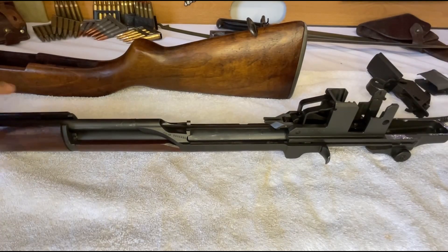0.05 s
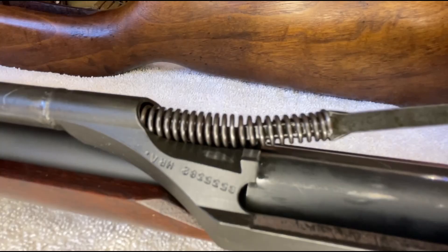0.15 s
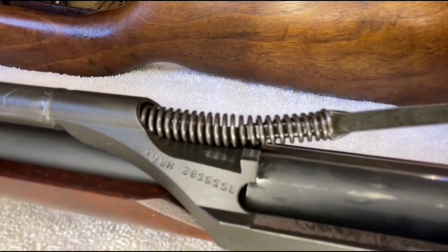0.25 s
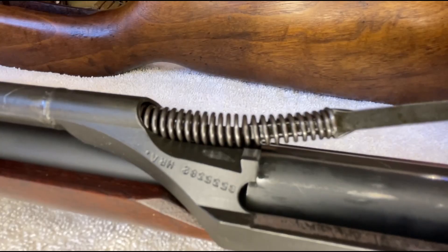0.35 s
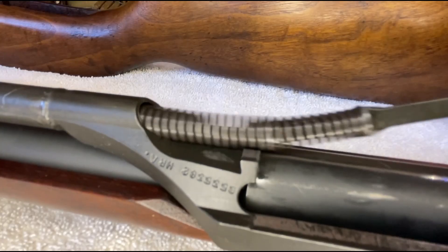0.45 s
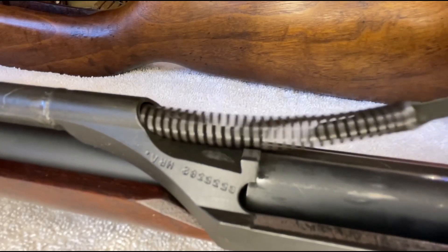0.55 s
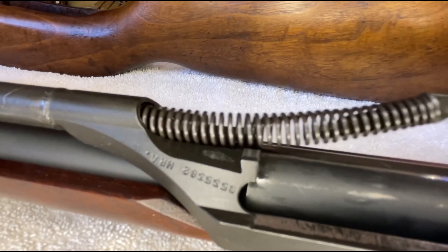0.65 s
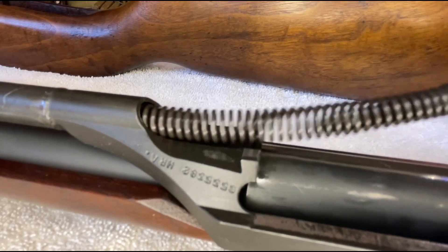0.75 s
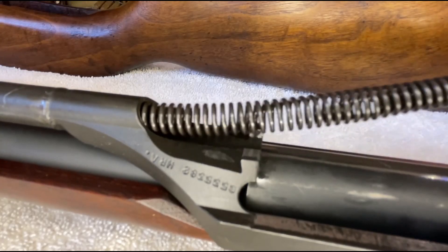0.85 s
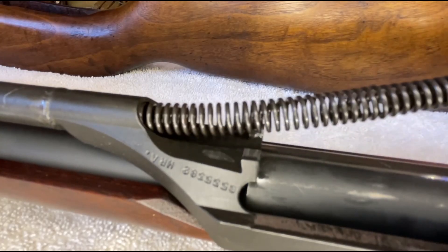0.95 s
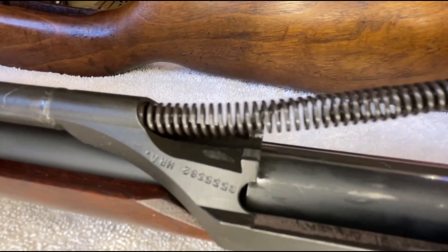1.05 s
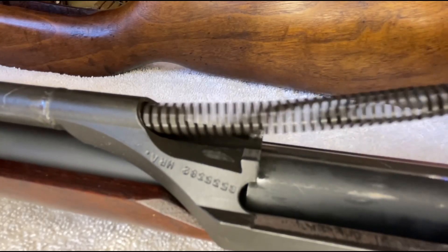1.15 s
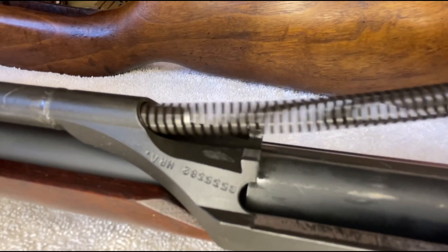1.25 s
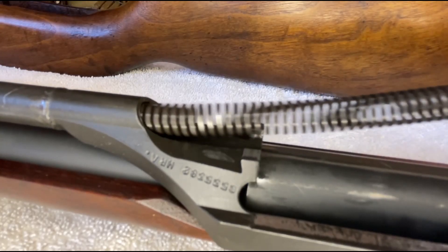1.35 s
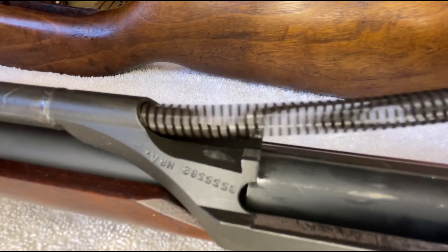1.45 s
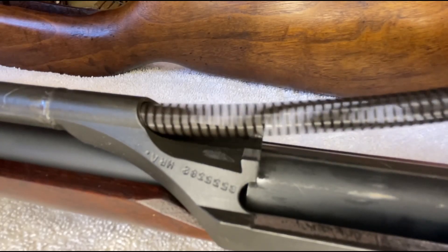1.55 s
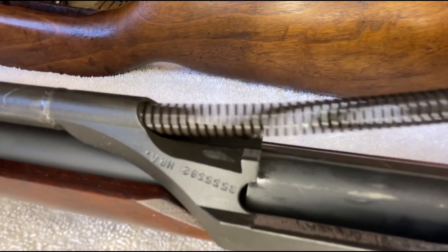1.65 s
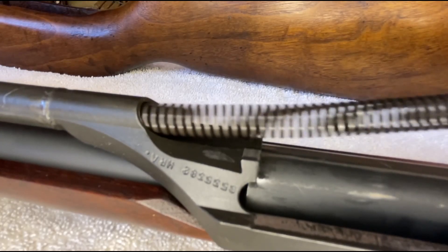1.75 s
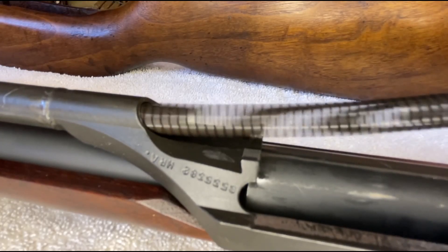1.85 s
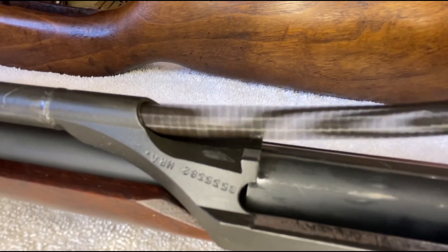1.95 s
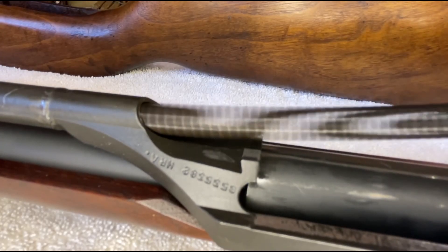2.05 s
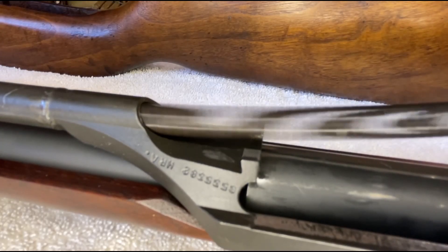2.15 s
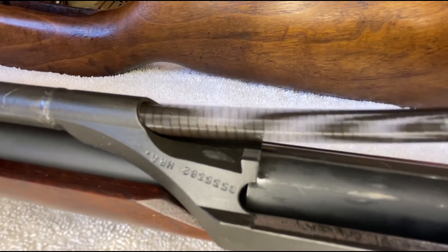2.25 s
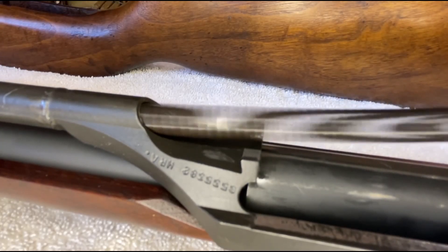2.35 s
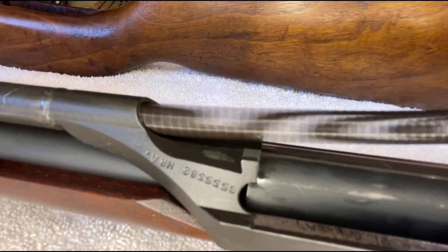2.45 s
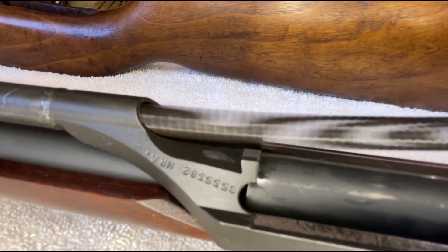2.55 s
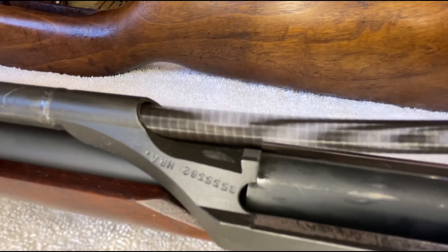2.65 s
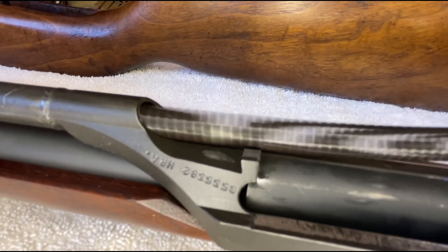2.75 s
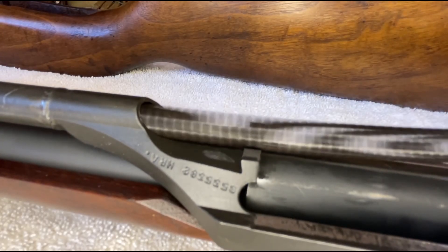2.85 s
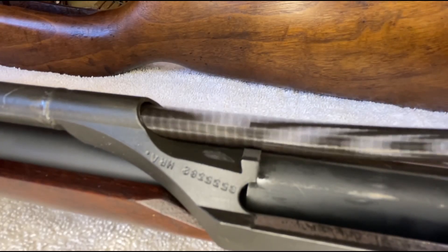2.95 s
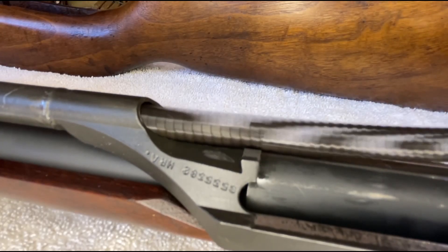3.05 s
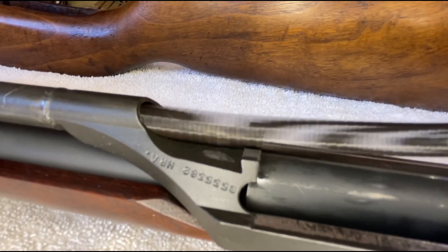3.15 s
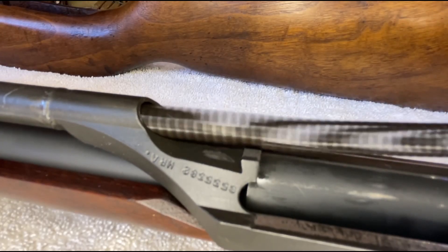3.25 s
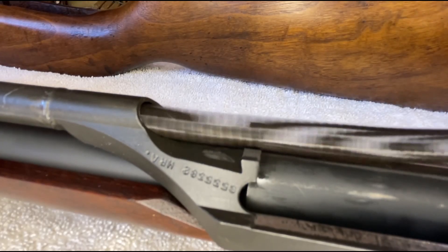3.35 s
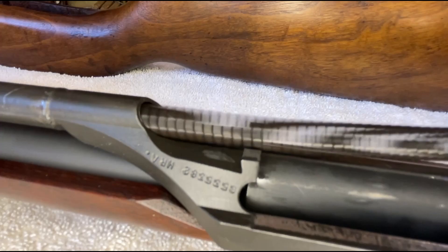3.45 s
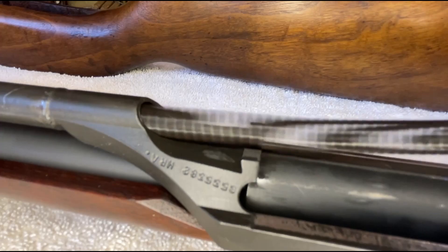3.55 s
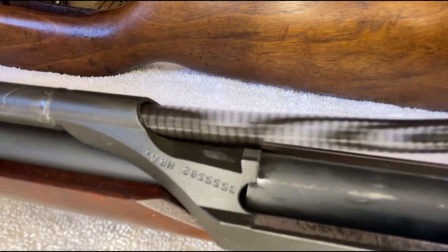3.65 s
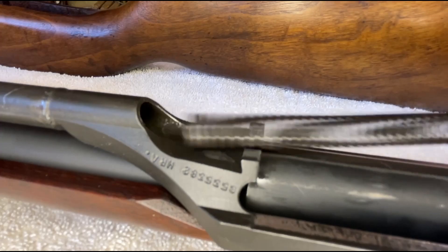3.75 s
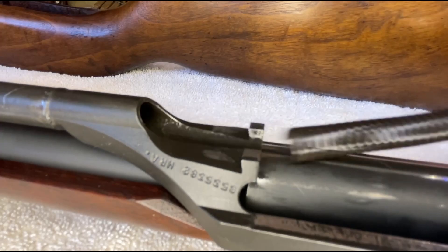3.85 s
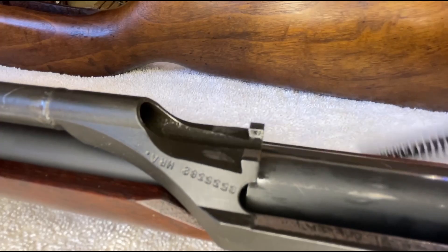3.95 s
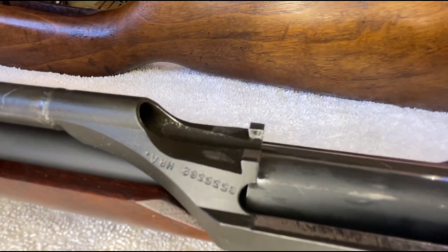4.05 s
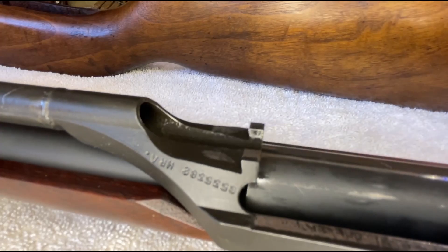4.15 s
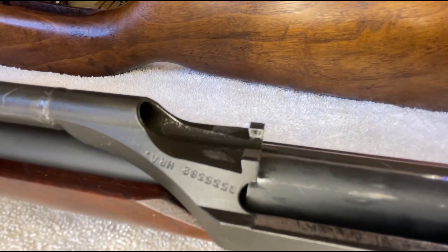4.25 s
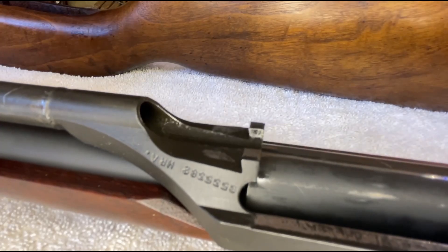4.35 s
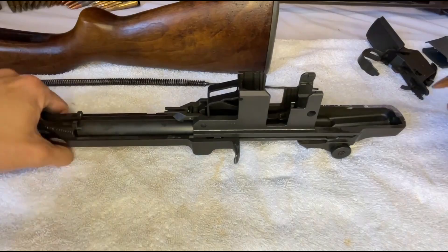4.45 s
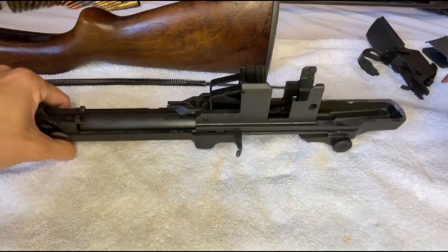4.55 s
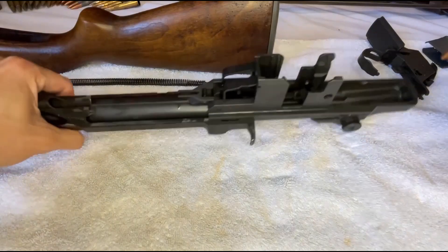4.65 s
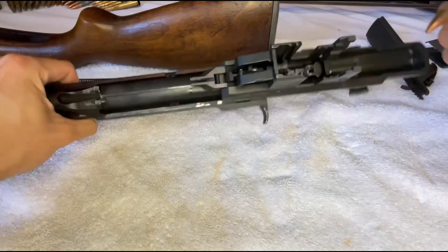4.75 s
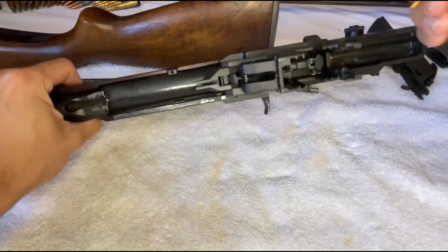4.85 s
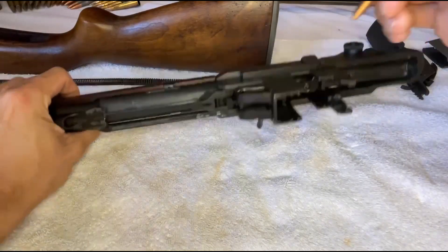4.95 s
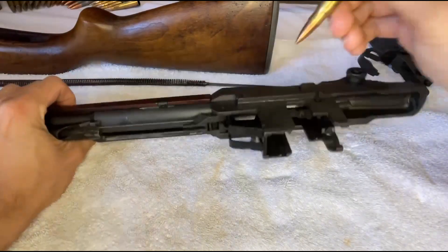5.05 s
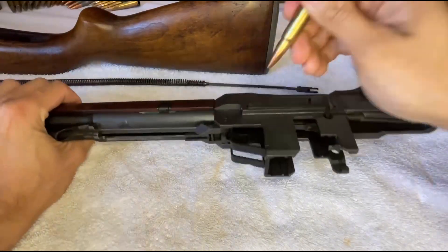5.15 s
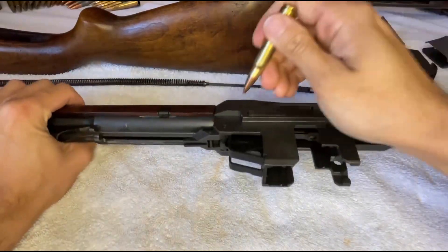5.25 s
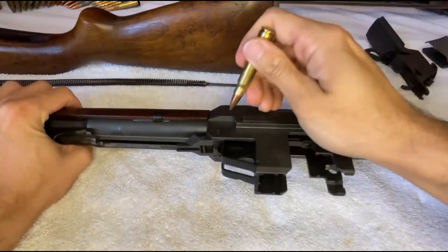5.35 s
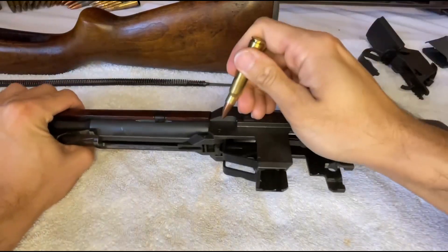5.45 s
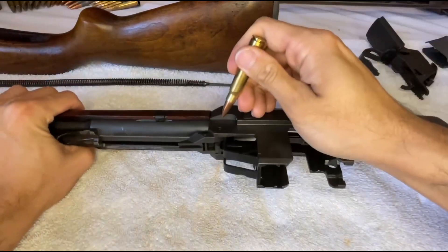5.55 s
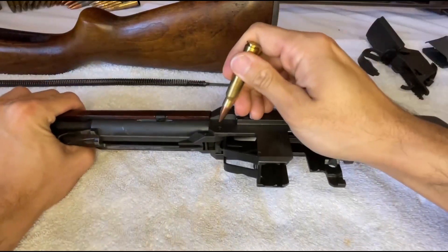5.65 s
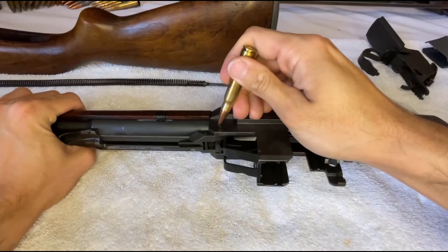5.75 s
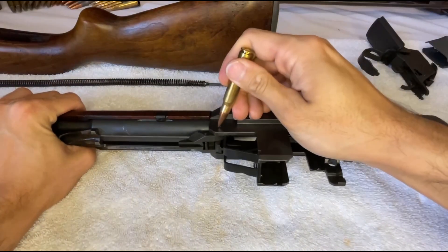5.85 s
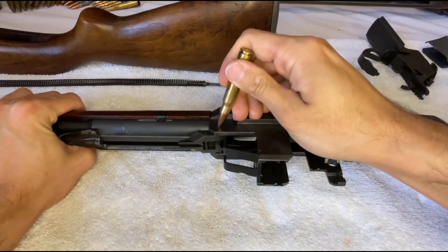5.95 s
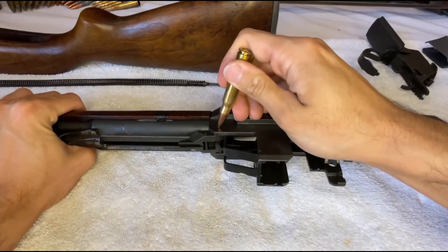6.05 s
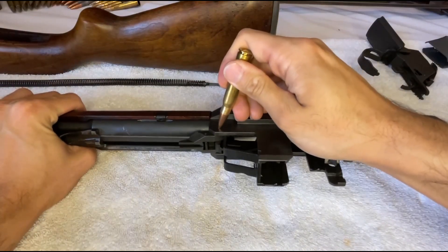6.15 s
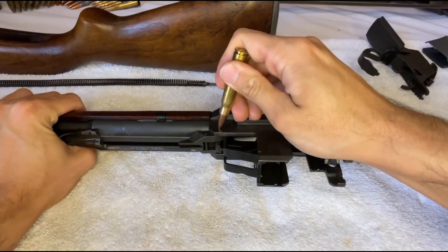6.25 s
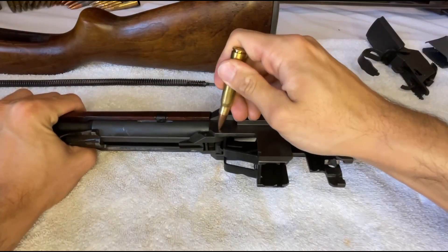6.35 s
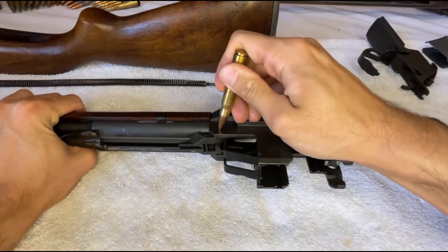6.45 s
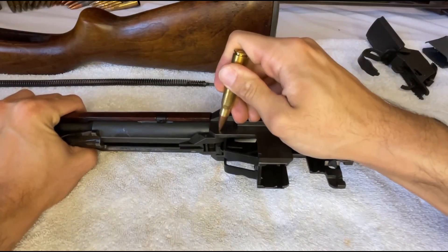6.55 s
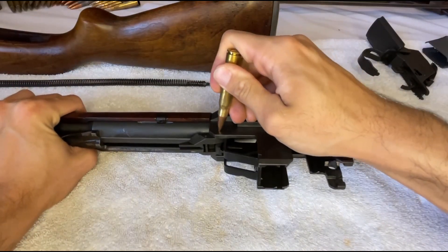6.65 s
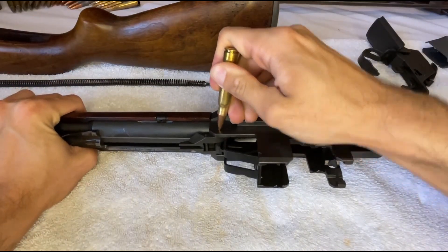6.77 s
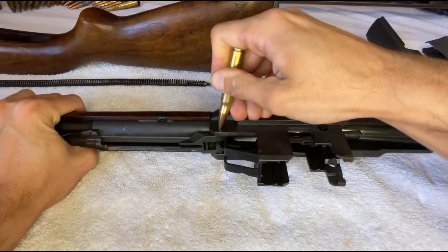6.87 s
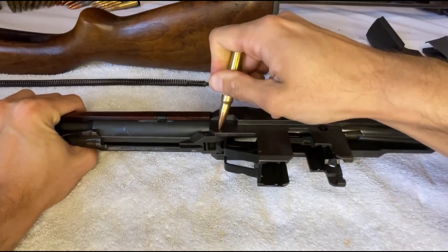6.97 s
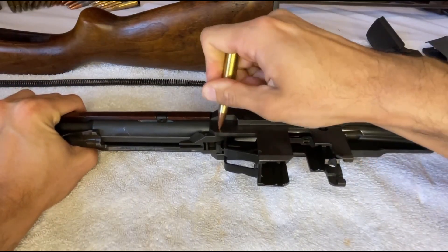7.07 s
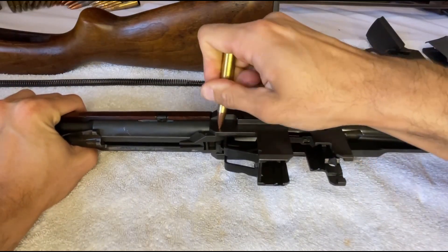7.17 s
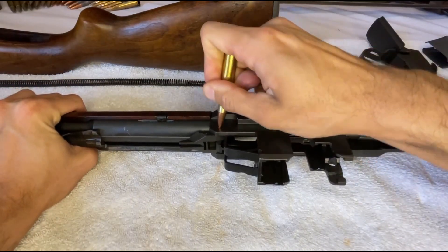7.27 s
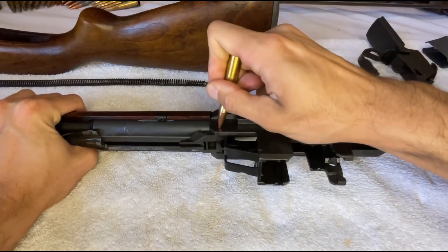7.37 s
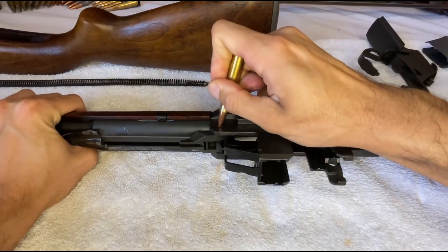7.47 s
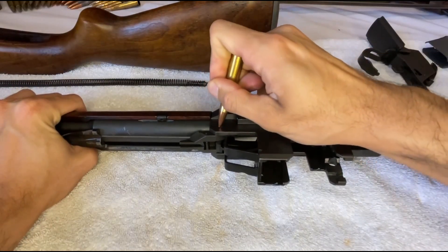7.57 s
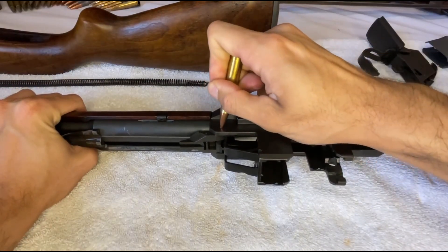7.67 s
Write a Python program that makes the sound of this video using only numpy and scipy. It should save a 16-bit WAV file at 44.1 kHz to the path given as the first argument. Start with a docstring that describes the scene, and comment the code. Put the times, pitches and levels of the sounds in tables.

```python
"""A long coil spring is drawn out of a rifle's steel tube: turns tick and rub, as clicks and noise into resonances.
Its end springs free and sings as noise-fed tones; the action is turned over, dropped on a towel-covered table
and prodded with a brass tip, in knocks of filtered noise bursts. Soft blows and leaning hands ring the table's
modes, grainy noise makes rustles and the tails of hard knocks, loose parts scratch in slips, faint tones hum.
A two-port microphone stands close, on the same table, in a quiet room with a short noise tail and steady air."""
import sys
import numpy as np
from scipy import signal
from scipy.fft import rfft, irfft, next_fast_len
from scipy.io import wavfile
from scipy.ndimage import uniform_filter1d

SR = 44100
rng = np.random.default_rng(int(sys.argv[2]) if len(sys.argv) > 2 else 0)


def unload_wav(signal):
    """Save mono or channel-first audio to the path in sys.argv[1] as 16-bit WAV at rate SR, clipped to [-1, 1]."""
    wavfile.write(
        sys.argv[1],
        SR,
        np.round(np.clip(np.atleast_2d(signal).T, -1, 1) * 32767).astype(np.int16),
    )


N = 340011

# hands leaning on the table, through the first tugs until the long pull begins, and again after it:
# (time [s], murmur of the lowest modes [dB], broad rumble [dB])
LEANING = [
    [(0.0, -46.5, -83), (0.054, -66, -81), (0.14, -92, -85), (0.366, -88, -80.5), (0.484, -62, -54),
     (0.628, -54, -68), (0.818, -72, -66.5), (1.034, -67, -78), (1.1, -64, -65)],
    [(3.9, -52.5, -58.5), (4.084, -64, -66), (4.194, -58.5, -63.5), (4.33, -71, -73.5),
     (4.516, -50.5, -59.5), (4.668, -67, -67.5), (4.77, -58.5, -68), (4.88, -43, -50), (5.01, -58, -59),
     (5.22, -62, -63), (5.4, -57, -61), (5.6, -54.5, -79), (5.86, -58.5, -74), (6.3, -61.5, -69),
     (6.4, -62, -61), (7.03, -64, -72.5), (7.44, -65, -76), (7.71, -65, -69.5)],
]
# upper murmuring mode against the lower, in each of the two stretches: [dB]
UPPER_MODE_DB = [-13, 0]
# table top: (frequency [Hz], relative level [dB], unloaded t60 [s])
TABLE_MODES = [(65.07, -10, 0.76), (83.3, -7, 0.42), (126.3, 1.5, 0.25), (198.5, -6.5, 0.16),
               (243.5, -7.5, 0.13), (363.6, -14.5, 0.25), (575, -18.5, 0.11), (794, -16.5, 0.13)]
# soft blows on the table: (time [s], relative level [dB])
THUDS = [(.01, -78), (4.811, -28.5), (4.822, -27.5), (4.988, -55), (5.386, -53), (6.36, -52.5)]

# rustles of towel and skin, and noisy tails after hard knocks:
# (start [s], loudest [s], end [s], dull part [dB], bright part [dB])
RUSTLE = [(0.0, 0.102, 0.25, -81, -85.5), (0.337, 0.346, 0.34, -64, -69),
          (3.947, 3.96, 4.276, -67.5, -69.5), (3.998, 4.2, 5.35, -76.5, -81.5),
          (4.359, 4.502, 4.78, -64.5, -73), (4.69, 4.775, 4.84, -88, -82), (4.8, 4.802, 4.956, -55.5, -60),
          (4.881, 5.001, 5.33, -80, -79.5), (5.04, 5.285, 5.47, -73.5, -82.5),
          (5.434, 5.465, 5.93, -81, -99), (6.01, 6.03, 6.17, -76, -73), (6.08, 6.25, 6.5, -72, -94),
          (6.14, 6.31, 6.52, -71, -92), (6.2, 6.375, 6.54, -72, -92), (6.688, 6.776, 6.88, -78, -80.5),
          (6.787, 6.893, 7.03, -88.5, -75), (7.009, 7.026, 7.2, -95, -86), (7.413, 7.425, 7.56, -79.5, -90)]
RUSTLE_EDGE_DB = -28.5   # a rustle's start and end against its loudest moment
# dull part of the rustle: (frequency [Hz], relative density [dB per Hz])
TOWEL_SPECTRUM = [(240, -30), (400, 3.5), (523, -11), (630, -5.5), (1640, -11.5), (4470, -14), (5920, -34),
                  (6500, -25.5), (8450, -47), (14300, -120)]

# the spring's own ringing: (frequency [Hz], relative level [dB], t60 [s])
ROD_MODES = [(3340, -8, .1), (3450, 0, .12), (3530, -5, .04), (3650, -8, .04)]
# how strongly it sings: (time [s], level [dB])
ROD_QUIVER = [(0., -83), (.08, -97), (.1, -120), (3.92, -120), (3.95, -70), (4.2, -77.5), (4.39, -83),
              (4.41, -120)]

# scratches of loose parts: (start [s], end [s], centre [Hz], level [dB])
SCRATCHES = [(0.048, 0.166, 1950, -82.5), (4.748, 4.794, 3220, -80), (5.209, 5.322, 3760, -78)]
# single ticks of a loose part: (time [s], relative level [dB])
SLIPS = [(5.1345, -74), (5.173, -68.5), (5.1972, -64.5), (5.2096, -64.5), (5.23, -58), (5.2404, -66),
         (5.2798, -63), (5.2893, -60.5), (5.3128, -62), (5.3474, -75)]
SLIP_HZ, SLIPS_PER_S = 3740, 400   # pitch of the single ticks; average rate of slips in a scratch

# how hard the spring drags in the tube, in two short tugs and one long pull: (time [s], drag [dB])
DRAG = [
    [(0.33, -99), (0.398, -83.5), (0.415, -64), (0.46, -58), (0.53, -65.5), (0.627, -73.5), (0.655, -80)],
    [(0.71, -105), (0.729, -79), (0.775, -62), (0.839, -84), (0.898, -99)],
    [(1.028, -108), (1.057, -80), (1.1, -79.5), (1.125, -63), (1.344, -63), (1.55, -58), (1.863, -58.5),
     (1.905, -50.5), (2.078, -45), (2.2, -47.5), (2.394, -44), (2.75, -45), (3.0, -45), (3.14, -49.5),
     (3.24, -40), (3.346, -39.5), (3.472, -50.5), (3.666, -42.5), (3.764, -48), (3.815, -34),
     (3.855, -53.5), (3.924, -53)],
]
# turns that catch singly, and in a rattle as the end slips out: (time [s], relative level [dB])
CATCHES = [(0.406, -60), (0.415, -47.5), (0.4331, -54), (0.4615, -44), (0.499, -71), (0.522, -46),
           (0.551, -51), (0.5813, -35), (0.6187, -41), (0.6757, -48.5), (0.7259, -40), (0.765, -44),
           (0.8125, -50), (0.924, -64), (1.046, -53.5), (1.096, -52), (1.1154, -39.5), (1.153, -42.5),
           (1.1828, -42), (1.2095, -46), (1.237, -52), (1.2665, -37.5), (1.3157, -47), (1.3484, -45),
           (1.469, -46), (1.519, -53), (1.549, -39), (1.5714, -43), (1.6041, -44), (1.653, -63),
           (1.7072, -42), (2.1268, -38), (2.2643, -50), (2.321, -39), (3.092, -44), (3.128, -38),
           (3.1654, -54), (3.5814, -33), (3.7816, -36.5), (3.792, -35), (3.7981, -25), (3.8047, -36),
           (3.8104, -34), (3.819, -26.5), (3.8275, -33), (3.8337, -33), (3.843, -34.5)]
# steady drawing, one tick per turn: (time [s], turns drawn past the lip [count])
DRAWN = [(1.8618, 0), (1.9401, 6), (2.0369, 13), (2.1292, 20), (2.1751, 23), (2.3192, 31), (2.4235, 38),
         (2.6804, 56), (2.9368, 76), (3.0401, 83), (3.0905, 86), (3.164, 88), (3.1803, 89), (3.2202, 92),
         (3.3454, 103), (3.435, 109), (3.4715, 110), (3.5265, 113), (3.5709, 116), (3.607, 119),
         (3.653, 122), (3.7205, 128), (3.7695, 131)]
TICK_DB = 16.5   # gain of a passing turn over the drag curve
# resonances of spring and tube: (frequency [Hz], width [Hz], relative level alike at both ports [dB],
# relative level opposed [dB], gain as the spring comes out [dB per s])
TUBE_TONES = [(732.6, 42, -12, -5, -3.5), (784, 46, -16, -19, 0.5), (1070, 34, -25, -10.5, -7),
              (1260, 24, -23, -3, 0.5), (1524, 20, -16, -10, 0.5), (1858, 40, -29.5, -15.5, 9),
              (2283, 40, -18.5, -7, 2.5), (2431, 86, -11, -11, -3.5), (2643, 22, -13, -20.5, -3.5),
              (2850, 120, -19.5, -20.5, 4), (3090, 87, -19.5, -21.5, 2), (3362, 28, -8.5, -16.5, -2.5),
              (3580, 54, -18, -8, 2), (3715, 240, -17, -19.5, 3), (4400, 280, -20, -20, 0.5),
              (5930, 290, -22.5, -11.5, -1), (7497, 120, -7.5, -6.5, 0.5), (8460, 250, -6, -4, 0),
              (9000, 170, -9.5, 1, -2), (8800, 250, -4.5, 1, 2), (10040, 90, 0, -11, -0.5),
              (10460, 92, -1.5, -7.5, 1.5), (10757, 130, 2.5, -17.5, -1.5), (10730, 90, -3, -22, -3),
              (11150, 830, -0.5, -25, 3)]
TONE_PIVOT_S = 2.5   # moment when that gain is zero
# rasp between the resonances: (frequency [Hz], relative density [dB per Hz])
TUBE_BODY = [(240, -45.5), (400, -7), (511, -11), (722, -24), (1140, -29.5), (1800, -37.5), (2390, -21),
             (3700, -12), (4060, -28.5), (4500, -13.5), (5300, -12.5), (6300, -8), (7100, -8.5),
             (8050, -22.5), (8700, -5.5), (9800, -2.5), (10500, -1), (11700, -2), (12100, -16),
             (12500, -45), (16200, -69), (22000, -120)]
# the rasp's two-port balance: (frequency [Hz], opposed minus alike [dB])
ACROSS = [(200, -3.5), (460, 3.5), (700, 7), (1050, 12), (1590, 12), (2390, 2.5), (3600, 1), (5420, -4),
          (6300, -3.5), (8160, 5), (9700, -2), (10600, -9.5), (12300, -27.5)]
# lower tube tones stand out more under a light drag: offset [dB] at the reference drag, slope [dB per dB]
LOWER_DB, LOWER_PER_DRAG, REFERENCE_DRAG_DB = 0.5, -0.31, -48
TREBLE_HZ = 6500   # edge between lower and treble tube tones
# pitch wander of the tones, below and above that edge: [share of pitch]
WANDER = [.008, .004]
# level flicker of the tones, below and above that edge: [dB]
FLICKER_DB = [3.5, 2.0]
WANDER_PER_S = 3.0   # pace of the pitch wander as the contact moves
PATCHY_DB, PATCHES_PER_S = 4.5, 12   # the rasp changes colour from moment to moment
# shaking of the table under the pull: (time [s], relative level [dB])
SHAKE = [(0.33, -100), (0.42, -66), (0.6, -68), (0.83, -79), (0.98, -94), (1.14, -69), (1.8, -65.5),
         (2.13, -51), (2.3, -55), (2.55, -48.5), (2.81, -49.5), (3.08, -56.5), (3.38, -51.5), (3.55, -58.5),
         (3.8, -55.5), (3.92, -63.5)]
SHAKE_WAVERS_DB, DEEP_SHAKE_DB = 1, -4.5   # unevenness; the table's lowest modes against the shake curve
# rough push on the table while turns catch singly, and while they pass steadily: [relative amplitude]
GRIT = [.04, .011]

# metal knocks: (time [s], level [dB], centre [Hz], broad crack against the centre [dB],
# rattle against the crack [dB], rattle t60 [s], left over right [dB])
KNOCKS = [(3.927, -31, 3300, -7, -22, .02, 4), (3.931, -39.5, 750, -21, -8, 0.04, 7),
          (3.9288, -13, 2950, -11, -7.5, 0.035, 3.5), (3.9292, -35, 1800, -16, 0, .03, 4),
          (3.991, -46, 760, -27, -2, 0.051, -1), (4.212, -50.5, 726, -18, -4, 0.14, 5),
          (4.809, -21.5, 3700, -2.5, -4.5, 0.1, 0.5), (4.8094, -23.5, 7900, -33, -23, .12, 3),
          (4.812, -37.5, 522, -22, -3, 0.17, 1), (4.989, -52, 786, -21.5, -5, 0.072, 3),
          (5.021, -63, 2412, -20.5, -10, .03, 7.5), (5.0682, -52, 4150, -7, -15, 0.12, 6),
          (5.79, -69, 2600, -15.5, -26.5, 0.049, 2.5), (5.852, -51, 1607, -19.5, -7.5, 0.084, 3),
          (5.8525, -44, 3540, -11, -20, 0.14, 2), (6.0078, -45, 1200, -16, -6, 0.07, 3),
          (6.0092, -34.5, 4030, -16, -17.5, 0.09, 3), (6.0736, -48.5, 1570, -17.5, -1, 0.04, 4),
          (6.073, -50.5, 3800, -23, -5, 0.077, 6), (6.2631, -59, 11070, 2, -23, 0.062, 0),
          (6.358, -60, 720, -25, -7, .06, -1), (6.4084, -59.5, 3620, -15, -21, 0.029, 3),
          (6.4317, -56, 3400, -16.5, -19, 0.025, 6), (6.4794, -57.5, 3670, -15, -28.5, 0.023, 10.5),
          (6.5986, -67.5, 1597, -7.5, -8.5, 0.089, 8.5), (6.908, -61, 3400, -23.5, -11, 0.084, 4.5),
          (7.1848, -68, 4220, -25, -15, 0.039, 7), (7.4299, -59, 1600, -17, -6, 0.046, 2.5),
          (7.4293, -68.5, 7200, -20, -10.5, 0.047, 2), (7.6002, -52, 1690, -18, -13, 0.11, 6),
          (7.5998, -53, 3640, -11.5, -18.5, 0.073, 3.5), (7.632, -62.5, 1660, -26, -2, 0.11, 4),
          (7.6854, -61.5, 1560, -18, -12, 0.056, 6), (7.683, -58, 6700, -18.5, -17.5, 0.091, 2.5)]
# modes of the action: (frequency [Hz], relative level [dB], t60 [s])
ACTION_MODES = [(750, -8, 0.025), (1560, -3, .022), (1760, -8, .018), (2350, -14, .04), (2670, -6, .018),
                (3235, -7, 0.016), (3450, -7, 0.016), (3670, -6, 0.018), (4100, -8, 0.014),
                (4390, -8, 0.016), (6900, -4, .016), (7500, -5, 0.016), (8870, -4, .013)]
TREBLE_T60_S = .03   # extra fading of the widest part of a crack

# faint tones that come and go: (start [s], end [s], frequency [Hz], level [dB])
HUMS = [(6.045, 6.843, 415, -82), (6.863, 7.8, 257.1, -77.5)]
# air of the room: (frequency [Hz], relative density [dB per Hz])
AIR_SPECTRUM = [(12, -66), (20, -14), (83, -5), (203, -37.5), (258, -15), (296, -44.5), (348, -14.5),
                (493, -54), (564, -29), (2420, -41.5), (11200, -47), (12500, -66), (16200, -95),
                (22000, -120)]
AIR_DB = -73.5
ROOM_T60_S, ROOM_DB = .18, -18
RUMBLE_CUT_HZ, TOP_STOP_HZ = 42, 12850   # low cut; edge above which the top is gone


def amp(db):
    """Decibels to gain."""
    return 10 ** (np.asarray(db) / 20)


def rms_one(x):
    """Scale to rms 1."""
    return x / np.sqrt(np.mean(x ** 2) + 1e-20)


def padded(x):
    """Fill up with silence to the full length."""
    return np.pad(x, (0, N - len(x)))


def in_time(rows, outside=None):
    """Columns of a curve table at every sample."""
    s, *columns = np.transpose(rows)
    return [np.interp(np.arange(N) / SR, s, c, outside, outside) for c in columns]


def stretches(tables):
    """Gains of level curves that sound in separate stretches, smoothed at the ends."""
    gains = np.sum([amp(in_time(rows, outside=-200)) for rows in tables], axis=0)
    return uniform_filter1d(gains, size=400) + 1e-12


def at_hz(points, hz):
    """Read a spectrum on a log-frequency axis."""
    table_hz, db = np.transpose(points)
    return np.interp(np.log(hz + 1), np.log(table_hz + 1), db)


def colour(x, points):
    """Shape a steady sound by a spectrum."""
    size = next_fast_len(N)
    gain = amp(at_hz(points, np.fft.rfftfreq(size, 1 / SR)))
    return irfft(rfft(x, size) * gain, size)[..., :N]


def band(x, low_hz, high_hz):
    """Gentle band-pass."""
    return signal.sosfilt(signal.butter(2, [low_hz, high_hz], "band", fs=SR, output="sos"), x)


def drift(rate, size=N):
    """Slow chance, spread 1, drawn at every 32nd sample."""
    r = np.exp(-64 * np.pi * rate / SR)
    noise = rng.standard_normal(size // 32 + 1002)
    slow = signal.lfilter([1], [1, -2 * r, r * r], noise)[1000:]   # skip the filter's start
    return np.interp(np.arange(size) / 32, np.arange(len(slow)), rms_one(slow))


def ring(force, hz, t60):
    """A unit click sets a sine of height 1 ringing and dying away."""
    r, w = amp(-60 / (t60 * SR)), 2 * np.pi * hz / SR
    return signal.lfilter([0, np.sin(w)], [1, -2 * r * np.cos(w), r * r], force + 1e-18)


def clicks(times, gains):
    """A click train."""
    out = np.zeros(N)
    np.add.at(out, np.clip((np.asarray(times) * SR).astype(int), 0, N - 1), gains)
    return out


def smear(train, t60):
    """Each click becomes a short dying burst of chatter."""
    envelope = signal.lfilter([1], [1, -amp(-60 / (t60 * SR))], np.abs(train))
    return envelope * rng.choice([-1, 1], N)


def table(force, damping):
    """The table top's modes ring; a load lying on it shortens them."""
    return sum(amp(db) * ring(force, hz, t60 / damping) for hz, db, t60 in TABLE_MODES)


def leaning():
    """Tremor of the hands keeps the two lowest table modes murmuring over a broad rumble."""
    murmur, rumble = stretches(LEANING)
    upper_gain = murmur * amp(np.where(np.arange(N) / SR < LEANING[1][0][0], *UPPER_MODE_DB))
    lower, upper = (rms_one(ring(rng.standard_normal(N), hz, 0.48)) for hz in (67., 87.))
    broad = rms_one(table(band(rng.standard_normal((2, N)), 88, 700), damping=5.4))
    alike = murmur * lower + upper_gain * upper + rumble * broad[0]
    low_across = rms_one(band(rng.standard_normal(N), 40, 120))
    across = amp(-5.5) * rumble * broad[1] + amp(-10.5) * upper_gain * low_across
    return alike * amp([[.7], [-.7]]) + across * [[1], [-1]]


def rustle():
    """Rustles and knock tails in fine grains; the two ports hear unrelated noise under the same swells."""
    swells = []
    for start, top, end, dull_db, bright_db in RUSTLE:
        edge = (dull_db + RUSTLE_EDGE_DB, bright_db + RUSTLE_EDGE_DB)
        swells.append([(start, *edge), (top, dull_db, bright_db), (end, *edge)])
    dull, bright = stretches(swells)
    grains = rng.standard_normal((2, 2, N)) * amp(1.2 * drift(25))
    low = dull * rms_one(colour(grains[0], TOWEL_SPECTRUM))
    high = bright * rms_one(band(grains[1], 3600, 10000))
    return (low + high) * amp([[4.0], [1.5]])


def rod():
    """The spring sings roughly, noise feeding its modes: a trace at first, then more once it is free."""
    sung = sum(amp(db) * rms_one(ring(rng.standard_normal(N), hz, t60)) for hz, db, t60 in ROD_MODES)
    return amp(in_time(ROD_QUIVER)[0]) * sung * amp([[1.5], [-1.5]])


def air():
    """Steady noise of the room's air, its own at each port."""
    return amp(AIR_DB) * rms_one(colour(rng.standard_normal((2, N)), AIR_SPECTRUM))


def thuds():
    """Blows softened by the towel set the table's modes ringing."""
    s, db = np.transpose(THUDS)
    soft = band(clicks(s, amp(db) * (-1) ** np.arange(len(s))), 37, 520)
    return table(soft, damping=1.43) * amp([[.5], [-.5]])


def scratches():
    """Quick uneven slips around the scratch's pitch, the clearest ticking singly, nearer the left port."""
    t = np.arange(N) / SR
    slips = smear((rng.random(N) < SLIPS_PER_S / SR) * amp(3.0 * rng.standard_normal(N)), .015)
    s, db = np.transpose(SLIPS)
    out = amp(11.5) * band(smear(clicks(s, amp(db)), 0.014), SLIP_HZ / 1.07, SLIP_HZ * 1.04)
    for start, end, hz, db in SCRATCHES:
        swell = np.sin(np.pi * np.clip((t - start) / (end - start), 0, 1)) ** .5
        narrow = band(band(slips, hz / 1.2, hz * 1.2), hz / 1.2, hz * 1.2)
        out = out + amp(db) * swell * rms_one(narrow)
    return out * amp([[4.0], [-4.0]])


def spring():
    """Turns tick over the lip and rub in the tube; both ring the steel and shake the table."""
    rub_db = np.max([in_time(rows, outside=-100)[0] for rows in DRAG], axis=0)
    t = np.arange(N) / SR
    pulled = (t > DRAG[0][0][0]) & (t < DRAG[-1][-1][0])
    s, turns = np.transpose(DRAWN)
    passing = clicks(np.interp(np.arange(turns[-1] + 1), turns, s), 0.39)
    uneven = amp(1.1 * rng.standard_normal(N))
    mid, side = tube(contact_force(rub_db, passing * uneven, pulled))
    alike, across = table_shake(passing, uneven, pulled)
    return (mid + alike + (side + across) * [[1], [-1]]) * amp([[-.1], [.1]])


def contact_force(rub_db, passing, pulled):
    """Rubbing noise and chattering ticks; one part reaches the ports alike, an unrelated one opposed."""
    ticks = passing * amp(rub_db + TICK_DB)
    # lesser turns touch the wall at random between the ticks
    touch_db = 2.0 * np.minimum(rng.exponential(1, N), 2) + rub_db - 10.0
    touches = (rng.random(N) < 200 / SR) * amp(touch_db) * pulled
    s, db = np.transpose(CATCHES)
    contacts = ticks + touches + clicks(s, amp(db))
    rub = rng.standard_normal((2, N)) * amp(rub_db - 7.5 + 1.0 * drift(60)) * pulled
    chatter = np.array([.75 * smear(contacts, .007) for _ in rub])
    chatter[0] += 2.2 * contacts   # the snap that starts each tick
    # thin wire carries the ticks as treble; the tube's lower tones hear more of the rubbing, and coarser
    low, high = (signal.butter(3, 6200, kind, fs=SR, output="sos") for kind in ("low", "high"))
    lower_gain = amp(LOWER_DB + LOWER_PER_DRAG * (rub_db - REFERENCE_DRAG_DB))
    coarse = amp(7.5 + 0.86 * drift(45)) * rub + 0.18 * chatter
    return signal.sosfilt(high, rub + chatter) + lower_gain * signal.sosfilt(low, coarse)


def tube(force):
    """The contact rasps broadly and rings the resonances of spring and tube, alike (mid) and opposed (side)."""
    mid, side = amp(3.5) * colour(force, TUBE_BODY)
    side, end = colour(side, ACROSS), 4 * SR
    mid[:end], side[:end] = amp(-2.0) * patchy(np.array([mid[:end], side[:end]]))
    out_s = np.maximum(np.arange(end) / SR - TONE_PIVOT_S, -1.3)
    for k, (hz, width, alike_db, opposed_db, gain_db) in enumerate(TUBE_TONES):
        treble = int(hz > TREBLE_HZ)
        # only treble tones alternate in sign, which leaves dark gaps between the lower ones
        peak = sliding_peak(force[:, :end], hz, width) * (-1) ** (k * treble)
        peak *= amp(13.5 + gain_db * out_s + FLICKER_DB[treble] * drift(15, size=end))
        mid[:end] += amp(alike_db) * peak[0]
        side[:end] += amp(opposed_db) * peak[1]
    return mid, side


def patchy(x):
    """Bands under half an octave wide, each swelling and fading on its own."""
    edges = np.geomspace(300, 14000, 13)
    return sum((-1) ** k * band(x, low, high) * amp(PATCHY_DB * drift(PATCHES_PER_S, size=x.shape[1]))
               for k, (low, high) in enumerate(zip(edges, edges[1:])))


def sliding_peak(force, hz, width):
    """A resonance whose centre wanders, stepped in short blocks."""
    out, state, r = np.zeros_like(force), np.zeros((2, 2)), np.exp(-np.pi * width / SR)
    centre = hz * (1 + WANDER[int(hz > TREBLE_HZ)] * drift(WANDER_PER_S, size=force.shape[1]))
    feed = [(1 - r * r) / 2, 0, -(1 - r * r) / 2]
    for i in range(0, force.shape[1], 1600):
        poles = [1, -2 * r * np.cos(2 * np.pi * centre[i] / SR), r * r]
        out[:, i:i + 1600], state = signal.lfilter(feed, poles, force[:, i:i + 1600], zi=state)
    return out


def table_shake(passing, uneven, pulled):
    """Each turn also pushes the table softly, so the bass hums at the ticking rate and its multiples."""
    shake_db = in_time(SHAKE)[0] + SHAKE_WAVERS_DB * drift(6.0)
    grit = np.where(np.arange(N) / SR < DRAWN[0][0], *GRIT) * rng.standard_normal((2, N))
    push = passing * uneven ** 0.35 + clicks(np.transpose(CATCHES)[0], 0.95) + grit[0]
    push_across = np.roll(passing, 60) + 4.7 * grit[1]

    def shaken(force, low_hz, high_hz, damping, db):
        """Table modes rung by one band of the push."""
        rung = table(band(force[:4 * SR], low_hz, high_hz), damping)
        return rms_one(padded(rung)) * amp(shake_db + db) * pulled

    alike = shaken(push, 150, 330, 2.4, 0) + shaken(push, 49, 130, 9.0, DEEP_SHAKE_DB)
    return alike, shaken(push_across, 200, 600, 13.0, -6.0)


def knocks():
    """A dry crack and a dying rattle around the knock's pitch, faintly coloured by the action's modes."""
    out = np.zeros((2, N))
    strength = rng.normal(0, 3, (len(KNOCKS), len(ACTION_MODES)))
    chatter = rng.standard_normal((len(KNOCKS), 3, SR // 6))
    t = np.arange(SR // 6) / SR
    dulling = amp(-60 * t / TREBLE_T60_S)
    for row, each, noise in zip(KNOCKS, strength, chatter):
        s, db, centre_hz, broad_db, rattle_db, rattle_t60, pan_db = row
        decay = amp(-60 * t / 0.0073) + amp(rattle_db - 60 * t / rattle_t60)   # crack, rattle
        shape = np.clip(t / 0.00061, 0, 1) * decay
        force = (noise[:2] + 0.17 * noise[2]) * shape   # partly alike at the two ports
        near = band(force, centre_hz / 1.45, min(centre_hz * 1.45, .45 * SR))
        broad = band(force, centre_hz / 1.7, min(centre_hz * 3.3, 12000))
        widest = band(force * dulling, centre_hz / 25.0, min(centre_hz * 10.0, 12000))
        sound = near + amp(broad_db) * (broad + widest)
        for (hz, mode_db, t60), own_db in zip(ACTION_MODES, each):
            sound = sound + amp(mode_db + own_db - 23) * ring(near, hz, t60)
        sound = sound / np.abs(sound).max()
        at = round(s * SR)
        port_gain = amp(db + np.array([[pan_db / 2], [-pan_db / 2]]))
        out[:, at:at + len(t)] += (port_gain * sound)[:, :N - at]
    return out


def hums():
    """Faint, slightly rough tones in the background: noise-fed resonances, faded in and out."""
    t, out = np.arange(N) / SR, 0
    for start, end, hz, db in HUMS:
        fade = np.clip(np.minimum(t - start, end - t) / 0.059, 0, 1)
        out = out + amp(db) * rms_one(ring(rng.standard_normal(N), hz, 0.97)) * fade
    return out


def room(x):
    """A short diffuse tail of dying noise, its own on each side."""
    t = np.arange(SR // 2) / SR
    decay = amp(-60 * t / ROOM_T60_S) * np.clip(t / 0.0014, 0, 1)
    tail = band(rng.standard_normal((2, len(t))), 260, 18000) * decay
    tail = tail / np.sqrt(np.sum(tail ** 2) / 2)
    return amp(ROOM_DB) * signal.fftconvolve(x, tail, axes=1)[:, :N]


def scene():
    """Everything on the table, in the room's air; only the metal gets the room's tail."""
    metal = spring() + knocks() + scratches() + rod()
    return metal + room(metal) + thuds() + leaning() + rustle() + hums() + air()


def record(dry):
    """The deepest rumble is thinned, the top is cut steeply."""
    thinned = signal.sosfilt(signal.butter(3, RUMBLE_CUT_HZ, "high", fs=SR, output="sos"), dry)
    return signal.sosfilt(signal.cheby2(14, 70, TOP_STOP_HZ, fs=SR, output="sos"), thinned)


dry = scene()
out = record(dry)
unload_wav(out)
```